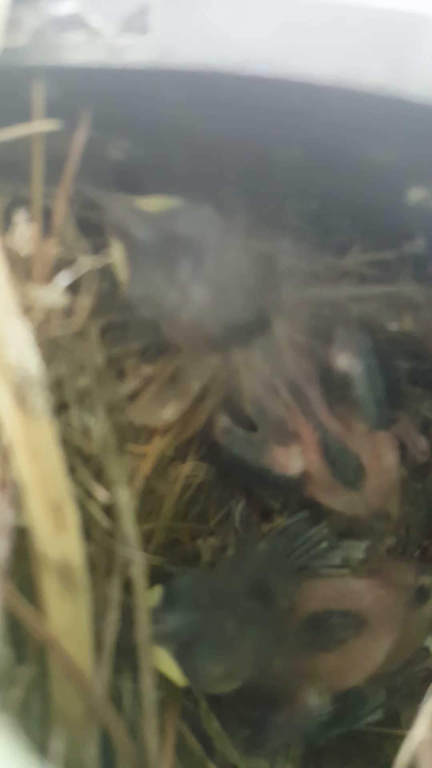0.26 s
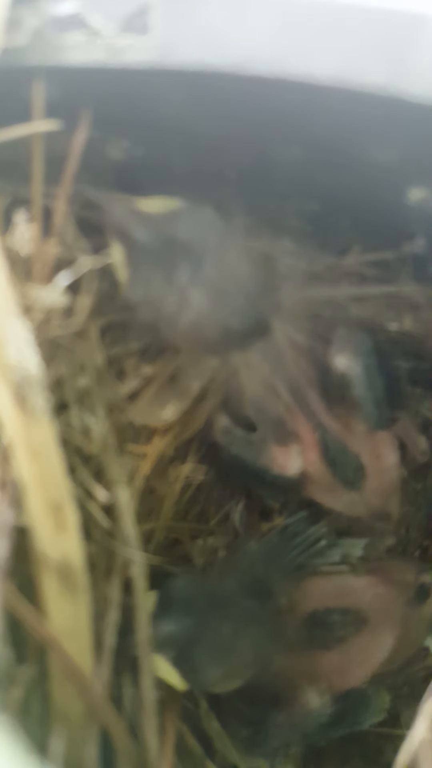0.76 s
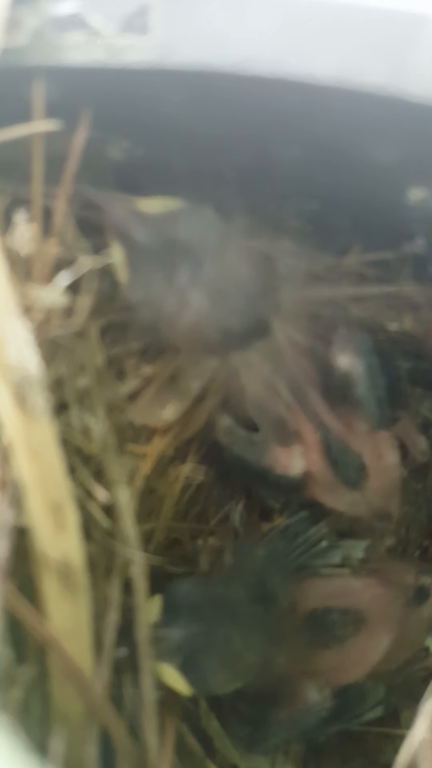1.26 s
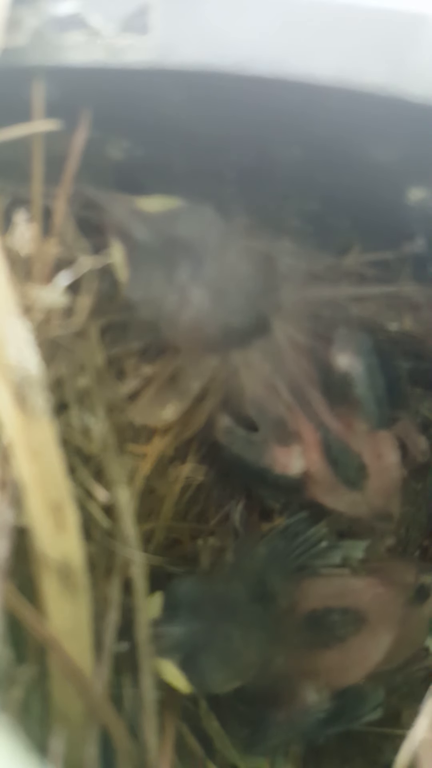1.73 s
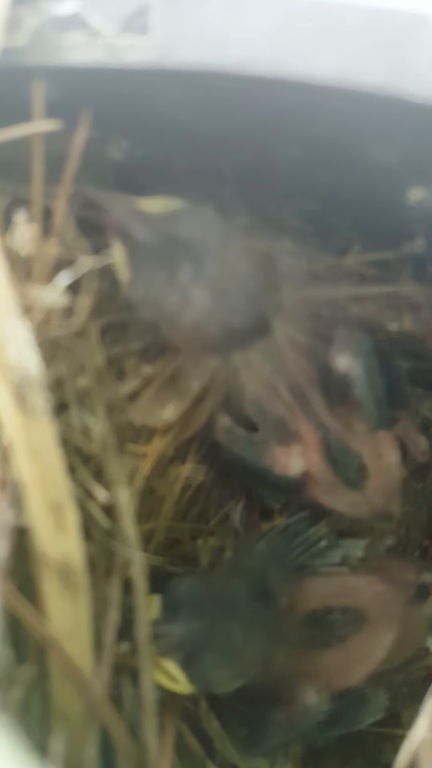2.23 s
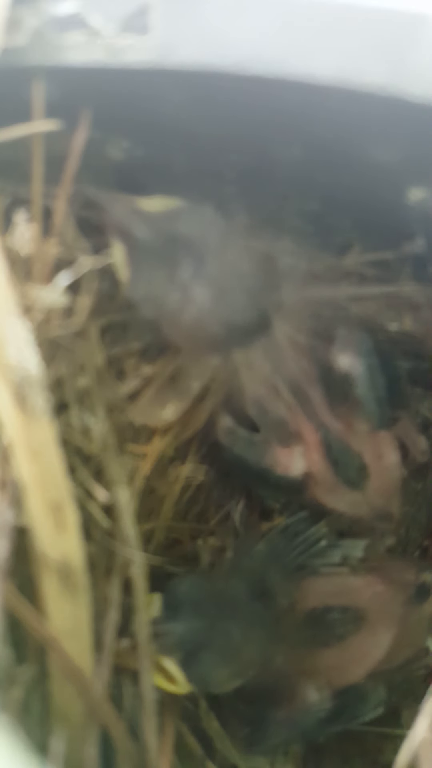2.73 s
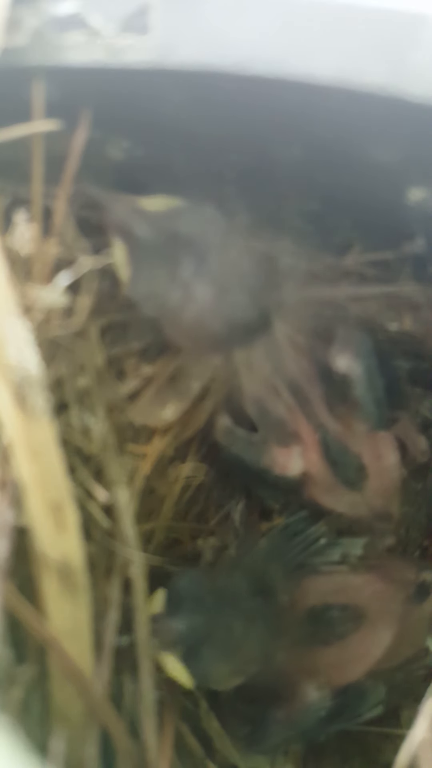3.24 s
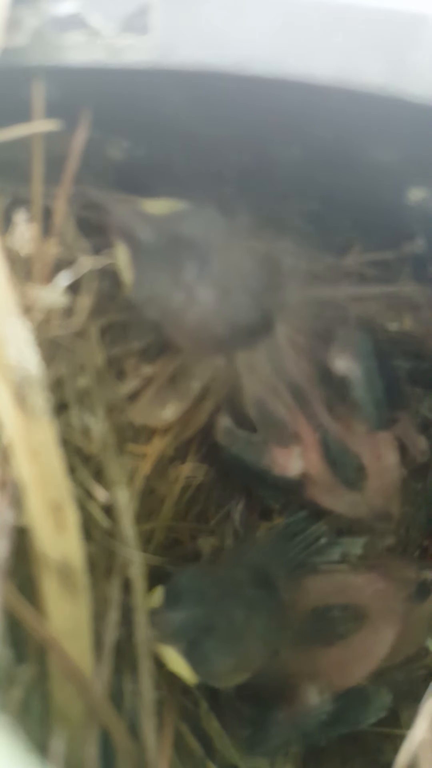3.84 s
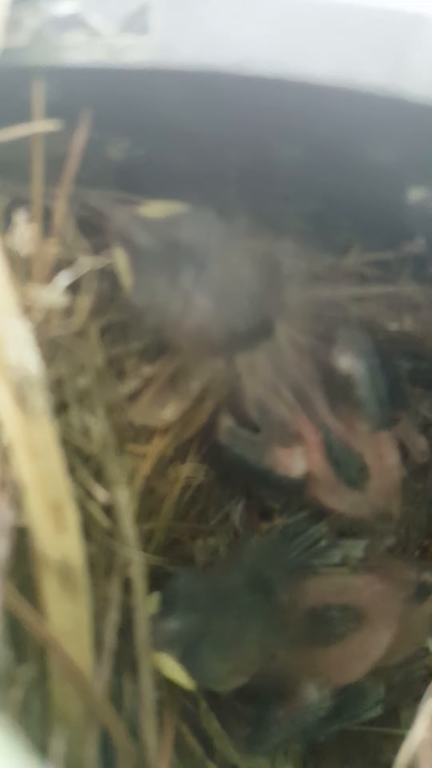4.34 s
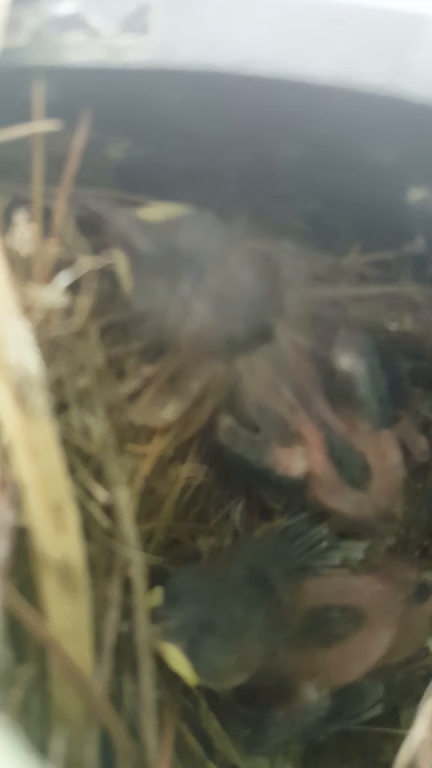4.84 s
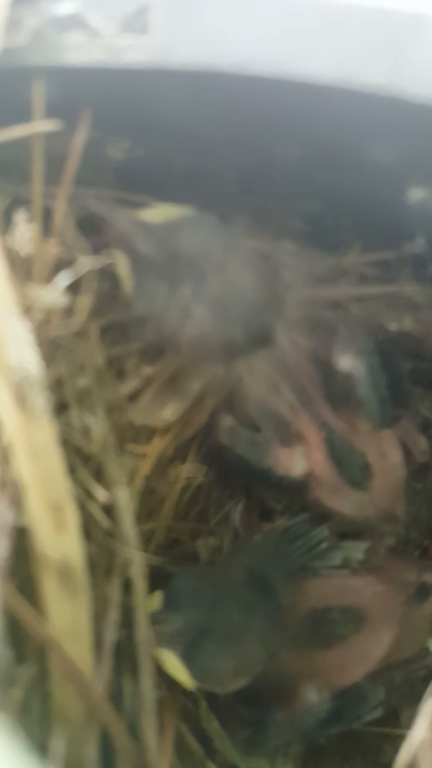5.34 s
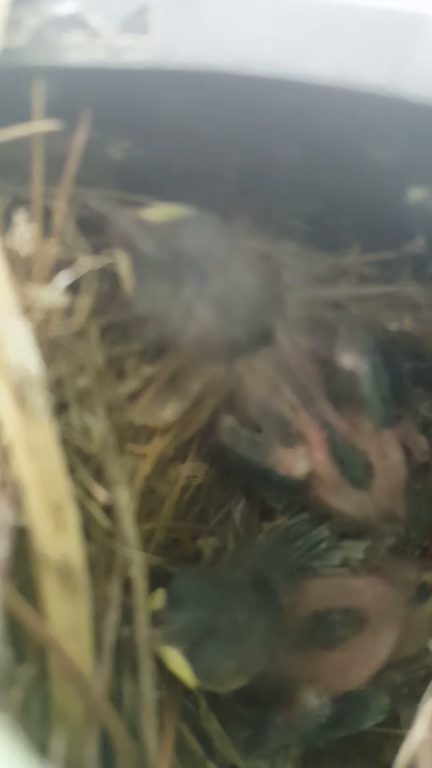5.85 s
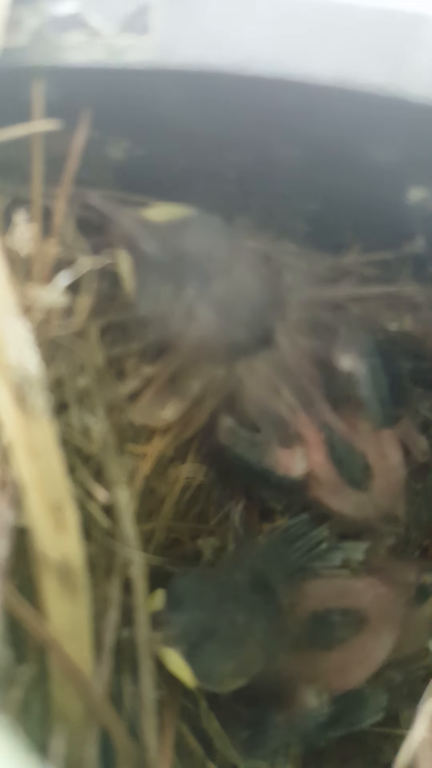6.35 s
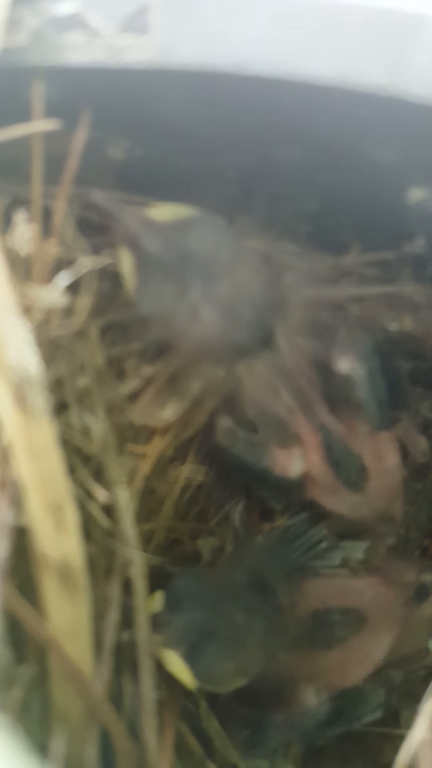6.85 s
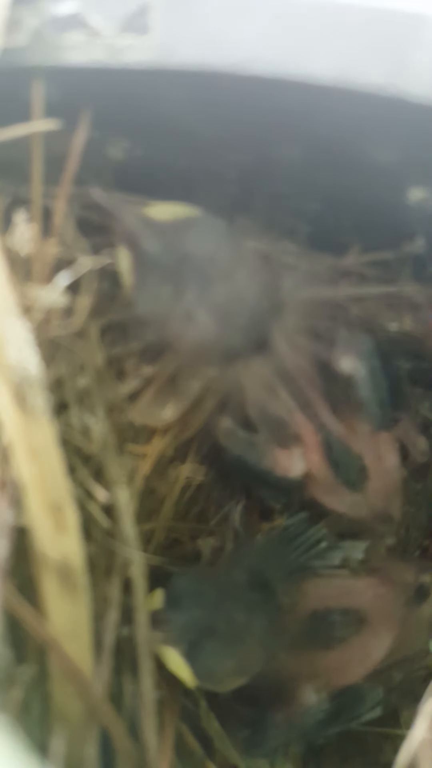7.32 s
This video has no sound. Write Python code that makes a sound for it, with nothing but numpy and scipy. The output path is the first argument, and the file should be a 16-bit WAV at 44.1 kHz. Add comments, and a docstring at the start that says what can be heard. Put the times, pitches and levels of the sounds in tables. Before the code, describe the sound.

Outdoors in grass, a six-cylinder vehicle hums low in the distance, then drops to idle with a faint falling whistle. It opens up with a rocking surge, swells to a roar of exhaust and tyres as it passes, then recedes. Thin insect shrilling continues; short burry chirps come mostly in pairs early on. Close dry straw rustles just after the loudest moment. Wide stereo, faint hiss.

```python
"""A six-cylinder vehicle creeps in the distance, idles, then accelerates past with a swell of tyre roar.
Its exhaust is a sum of lines locked to the crank angle, its road and air noise is shaped random noise,
and its turbocharger is a narrow band that glides; beams and inverse distance make the pass.
Nearby, insects shrill as filtered noise, something chirps mostly in pairs with a gliding sine,
and dry straw rustles as grainy noise bursts over a faint even hiss."""
import sys
import numpy as np
from scipy import signal
from scipy.fft import rfft, irfft, next_fast_len
from scipy.io import wavfile
from scipy.ndimage import uniform_filter1d, map_coordinates

SR = 44100
rng = np.random.default_rng(int(sys.argv[2]) if len(sys.argv) > 2 else 0)


def to_wav(s):
    """Save 16-bit WAV."""
    ch = np.atleast_2d(s).T  # columns
    pcm = np.round(np.clip(ch, -1, 1) * 32767)  # PCM
    wavfile.write(sys.argv[1], SR, pcm.astype(np.int16))


N = 334278  # samples


# left-right balance of the vehicle: [t/s, left minus right level/dB]
VEHICLE_PAN = [(0, 1.5), (5.8, 0.34), (6.7, 1.83)]


def vehicle():
    """Superposition: exhaust, road noise and turbocharger share one path and lie a little to the left."""
    firing_hz, effort_db, near_db, bearing = motion()
    sound = exhaust(firing_hz, effort_db, near_db, bearing)
    sound = sound + road_noise(firing_hz, effort_db, near_db, bearing)
    sound = sound + silencer(effort_db, near_db, bearing) + turbocharger(near_db)
    pan_db, = curves(VEHICLE_PAN)
    return sound * amp([pan_db / 2, -pan_db / 2])


# engine speed before the surge is added: [t/s, firing rate f/Hz]
ENGINE_SPEED = [(0, 58.27), (0.58, 63.33), (0.88, 63.33), (1.12, 64.7), (1.6, 66.6), (1.85, 64.67),
                (3.2, 65.06), (3.4, 67.24), (4.0, 66.6), (4.6, 71.18), (5.3, 74.9), (5.95, 77.22),
                (6.85, 78.3), (7.3, 78.85), (7.58, 79.56)]
# light throttle, idle, then full throttle: [t/s, effort level/dB]
THROTTLE_EFFORT = [(0, -5), (.5, -2.5), (1.62, -4), (1.97, -7.5), (3.27, -7), (3.46, -1), (5.2, 0.34)]
# the vehicle creeps, then drives past: [t/s, position along the road from the nearest point/m]
ROAD_POSITION = [(0, -61.5), (3.3, -43), (5.5, 0.5), (7.58, 34.5)]
DISTANCE_M = 20.2  # to the nearest point of the road


def motion(surge_hz=4.66, decay_s=1.03):
    """Inverse-distance law: firing rate (Hz), effort (dB), nearness (dB), bearing (rad, 0 abreast)."""
    firing_hz, = curves(ENGINE_SPEED)
    effort_db, = curves(THROTTLE_EFFORT)
    position_m, = curves(ROAD_POSITION)
    # opening the throttle rocks the drivetrain, so the speed swings and settles
    settling = np.exp(-np.maximum(clock() - SURGE_S, 0) / decay_s)
    bearing = np.arctan2(position_m, DISTANCE_M)
    near_db = 20 * np.log10(np.cos(bearing))
    return firing_hz + surge_hz * rocking() * settling, effort_db, near_db, bearing


SURGE_S, SURGE_PER_S = 3.42, 2.76  # start of the swing, swings a second


def rocking():
    """Torsional oscillation: the drivetrain swings between -1 and 1 once the throttle opens."""
    return np.sin(2 * np.pi * SURGE_PER_S * np.maximum(clock() - SURGE_S, 0))


def exhaust(firing_hz, effort_db, near_db, bearing, rasp_effort=1.53, drone_effort=1.3):
    """Harmonic synthesis: boom, rasp, hum, lope and drone all follow the crank angle."""
    firing = 2 * np.pi * np.cumsum(firing_hz) / SR
    crank = firing / 3  # six cylinders of a four-stroke fire three times a turn
    beamed = amp(rasp_effort * effort_db) * rasp(firing, bearing)
    beamed = beamed + amp(drone_effort * effort_db) * drone(crank, bearing)
    return boom(firing, firing_hz, near_db, bearing) + hum(crank) + lope(crank) + amp(near_db) * beamed


# the boom at the firing rate: [t/s, level/dB before the rocking]
BOOM_LEVEL = [(0.0, -32), (0.12, -31.5), (0.57, -33.5), (0.86, -27), (1.14, -28.5), (1.41, -20.5),
              (1.9, -27), (1.98, -44), (2.7, -34.5), (3.19, -42.5), (3.44, -21), (3.61, -19.5), (3.69, -28),
              (3.82, -20.5), (5.93, -18.5), (7.09, -26), (7.54, -22), (7.58, -22.5)]
# its octave sweeps over a notch and a resonance of the pipe: [f/Hz, level/dB over the boom]
OCTAVE_RESPONSE = [(120, -6), (127, -6), (132, -16), (136, -11.5), (140, -4.5), (148, 1.5), (155, 0.5),
                   (158, 0.5)]
# the octave is stronger just past abreast: [level/dB, bearing/deg, half width/deg, loss off the beam/dB]
OCTAVE_LOBE = (2.4, 28, 12, 3.7)


def boom(firing, firing_hz, near_db, bearing, resonance_hz=149, width_hz=4, rock_db=1.3):
    """Resonance: the octave's level and phase turn as it sweeps through the pipe's resonance."""
    # the level dips at each crest of the rocking and rises at each trough, most when abreast
    dip = amp(-rock_db * rocking() * amp(2 * near_db))
    octave = beam(bearing, *OCTAVE_LOBE) * amp(along(OCTAVE_RESPONSE, 2 * firing_hz) + 0.83 * wobble(9))
    turn = np.pi / 2 - np.arctan((2 * firing_hz - resonance_hz) / width_hz)
    level, = amp(curves(BOOM_LEVEL))
    return -np.sqrt(2) * level * dip * (np.cos(firing) + octave * np.cos(2 * firing + turn))


# rasp at 0 dB effort, abreast:
# [harmonic of the firing rate, level/dB, bearing/deg, half width/deg, loss off the beam/dB]
RASP_LOBES = [(3, -30, -8, 26, 10), (4, -31.5, 32.5, 22, 16)]


def rasp(firing, bearing, pipe_lag=.46):
    """Directivity: upper harmonics of the firing rate are beamed sideways; pipe_lag is in radians."""
    out = 0
    for k, *shape in RASP_LOBES:
        harmonic = -np.sqrt(2) * np.cos(k * firing + (k - 1) * pipe_lag)
        out = out + beam(bearing, *shape) * amp(2.45 * wobble(12)) * harmonic
    return out


# the exhaust favours other orders from each side, relative levels:
# [multiple of the crank speed, front level/dB, side level/dB, rear level/dB]
PIPE_ORDERS = [(10.48, 3, -25, -4.5), (10.87, -6, -22, -2), (12.05, -9.5, -25, -4.5), (12.92, -2, -1, -1.5),
               (14, 3, -20, 1.5), (15.16, 0.5, -20, -18), (16.02, -8, 2, -15), (16.96, -5, -3.5, -2.5),
               (18.11, -9, -4, -7), (18.95, 1, -7.5, -25), (21.16, -3.5, -16.5, -9), (23.95, -13, -24, -14)]
# front, side and rear lobes at 0 dB effort, abreast:
# [level/dB, bearing/deg, half width/deg, loss off the beam/dB]
PIPE_LOBES = [(-33.5, -38.5, 26.6, 27), (-23.5, 3.5, 22.7, 19), (-24, 75, 31, 19)]


def drone(crank, bearing):
    """Directivity: each view of the exhaust has its own higher orders, which sweep by in turn."""
    multiples, *views = np.transpose(PIPE_ORDERS)
    out = 0
    for shape, levels in zip(PIPE_LOBES, views):
        lines = orders(crank, zip(multiples, levels), smear=0.77, rate=10, spread=0.47, fading_db=4)
        out = out + beam(bearing, *shape) * lines
    return out


# hum of the lugging engine: [multiple of the crank speed, relative level/dB]
LUG_ORDERS = [(9, -6), (12, 1), (13, -8), (15, -7), (16, -6.5), (20, -9), (21, -5), (22, -7), (24, -12),
              (25, -7), (30, -9)]


def hum(crank, level_db=-42, end_s=1.85, release_s=0.21):
    """Order synthesis: lugging at low speed, the pipe hums until the throttle closes."""
    lugging = amp(level_db) * np.clip((end_s - clock()) / release_s, 0, 1)
    return lugging * orders(crank, LUG_ORDERS, smear=.6, rate=8, spread=.35, fading_db=2.6)


# unequal cylinders make the engine lope: [multiple of the crank speed, relative level/dB]
LOPE_ORDERS = [(2.5, -1), (3.5, -5), (4, 8.5), (4.5, 4.5), (5, -7), (5.5, 8), (6.5, 1.5), (7, -4.5)]
# [t/s, level/dB]
LOPE_SWELL = [(0, -37.5), (2.1, -39.5), (3.1, -39.5), (3.5, -31), (4.5, -37), (5.5, -41), (6.5, -41),
              (7.58, -32)]


def lope(crank):
    """Subharmonics: unequal cylinders add lines between the multiples of the firing rate."""
    level, = amp(curves(LOPE_SWELL))
    return level * orders(crank, LOPE_ORDERS, smear=0.76, rate=9, spread=0.064, fading_db=4.5)


# spectra of body rumble, roar, tyre hiss and engine air: [f/Hz, relative level/dB per Hz]
BODY_SPECTRUM = [(15, -8), (35, -6.5), (60, 3), (120, 3.5), (190, 5), (260, -2.5), (340, -1), (480, -1),
                 (650, -3), (900, -17.5), (2000, -56)]
ROAR_SPECTRUM = [(300, -50), (600, -3), (760, -6.5), (920, -5.5), (1100, -3), (1500, -10.5), (2000, -15),
                 (4000, -76)]
HISS_SPECTRUM = [(900, -26), (1500, -7), (2100, 0), (2800, -4.5), (3400, -14), (5000, -43.5), (9000, -64)]
AIR_SPECTRUM = [(2000, -9), (3200, 0.5), (4200, 0), (5600, -8), (7500, -11), (9200, -14), (10500, -21),
                (12500, -22), (16000, -32)]
# how each noise swells, by name: [level/dB at 0 dB effort abreast, share of the effort it follows,
# rise towards the rear/dB, lobe level/dB, lobe bearing/deg, lobe half width/deg]
NOISE_SWELLS = {"body": (-28, 0.97, 1.5, 0.5, 23, 19), "roar": (-33.3, 1.34, -1.1, 3, -4.5, 8.5),
                "hiss": (-36.5, 1.08, 1.3, 1.5, -24.5, 13), "air": (-42.5, 1.07, -0.7, 2.1, -5, 26)}


def road_noise(firing_hz, effort_db, near_db, bearing):
    """Amplitude modulation: noises swell with effort and nearness; body and roar puff once per firing."""
    def gain(name):
        db, share, rear_db, lobe_db, centre_deg, width_deg = NOISE_SWELLS[name]
        level_db = db + near_db + share * effort_db + rear_db * np.sin(bearing)
        return amp(level_db) * beam(bearing, lobe_db, centre_deg, width_deg, lobe_db)

    def puffs(depth):
        return unit(1 + depth * np.cos(2 * np.pi * np.cumsum(firing_hz) / SR))

    body = gain("body") * puffs(0.16) * rush(BODY_SPECTRUM, patchy_db=1.5)
    roar = gain("roar") * puffs(0.054) * rush(ROAR_SPECTRUM, patchy_db=1.5)
    hiss = gain("hiss") * rush(HISS_SPECTRUM, patchy_db=1.08)
    air = gain("air") * rush(AIR_SPECTRUM, patchy_db=1.9)
    return body + roar + hiss + air


def silencer(effort_db, near_db, bearing):
    """Cavity resonance: a hollow ring of the silencer, a narrow noise band beamed to the rear."""
    lobe = beam(bearing, db=-35, centre_deg=45, width_deg=19, depth_db=16.5)
    return amp(near_db + effort_db) * lobe * narrow(746, width_hz=130)


# runs down at idle, spools up under load, then eases: [t/s, whistle f/Hz]
TURBO_PITCH = [(1.9, 7290), (2.7, 5950), (3.25, 5400), (3.8, 6200), (5, 9100), (5.5, 9687), (6.6, 8800),
               (7.58, 8700)]


def turbocharger(near_db, level_db=-60.5, fade_s=0.85):
    """Narrow-band noise: the turbocharger's fuzzy whistle comes through once the throttle closes."""
    hz, = curves(TURBO_PITCH)
    rise = np.clip((clock() - TURBO_PITCH[0][0]) / fade_s, 0, 1)
    whistle = unit(0.87 * narrow(hz, width_hz=1100) + narrow(hz, width_hz=260))
    return amp(level_db + near_db) * rise * whistle


# spectra of the chorus and of the buzz: [f/Hz, relative level/dB per Hz]
CRICKET_SPECTRUM = [(6500, -43), (7400, -10.5), (7750, -10), (8200, -4.5), (8700, -6), (9000, -19),
                    (10000, -45), (12000, -61)]
BUZZ_SPECTRUM = [(3600, -63), (4000, -3), (4260, 0), (4600, -14), (6000, -50), (10000, -18), (11300, -16),
                 (12050, -5), (12700, -14), (13500, -22.5), (16000, -35)]
# single crickets that stand out, before the balance: [f/Hz, level/dB, end of song t/s]
NEAR_SINGERS = [(7910, -61.5, 3.9), (8020, -69, 8), (8250, -65.5, 8), (8670, -69.5, 8)]


def insects():
    """Band-limited noise: a cricket chorus, nearer singers, and a buzz near 4 and 12 kHz that soon stops."""
    chorus = amp(-55.5) * rush(CRICKET_SPECTRUM, patchy_db=-1.0)
    for hz, db, end in NEAR_SINGERS:
        fade = np.clip((end - clock()) * 10, 0, 1)  # over 0.1 s
        chorus = chorus + amp(db) * fade * narrow(hz, width_hz=70)
    buzz_db, = curves([(0, -54.5), (.7, -57), (.82, -64), (.9, -110)])  # t/s, level/dB
    balance = amp([[-.4], [.4]])  # slightly to the right
    return chorus * balance + amp(buzz_db) * rush(BUZZ_SPECTRUM, patchy_db=3.0)


# [t/s, level/dB before the direct and echo gains, length/s]
CHIRP_TIMES = [(0.413, -50, 0.082), (0.555, -49, 0.052), (1.213, -52.5, 0.045), (1.276, -48.5, 0.041),
               (1.871, -47, 0.061), (1.999, -48, 0.05), (2.584, -54.5, 0.057), (2.647, -53.5, 0.046),
               (3.91, -53, 0.1)]


def chirps(pitch_hz=3180, fall=0.03, waver_hz=95, burr=.75, burr_hz=48, ring_s=0.69, wet_db=-3):
    """Frequency modulation and reverberation: short, burry, falling chirps, scattered by the surroundings."""
    t, envelope, sag = clock(), np.zeros(N), np.zeros(N)
    for start, db, length in CHIRP_TIMES:
        progress = (t - start) / length
        inside = (progress > 0) & (progress < 1)
        u = progress[inside]
        pulsing = 1 - burr * np.cos(2 * np.pi * burr_hz * (t[inside] - start))
        envelope[inside] += amp(db) * pulsing * np.sqrt(np.abs(np.sin(np.pi * u)))
        sag[inside] = u - .5
    hz = pitch_hz * (1 - fall * sag) + waver_hz * wobble(230)
    tone = np.sqrt(2) * np.sin(2 * np.pi * np.cumsum(hz) / SR)
    call = envelope * amp(1.6 * wobble(60)) * tone
    # the tail falls 60 dB in ring_s and is cut at half a second
    tail = rng.standard_normal((2, SR // 2)) * amp(-60 * t[:SR // 2] / ring_s)
    echo = signal.fftconvolve(call[None], tail / np.linalg.norm(tail[0]), axes=1)[:, :N]
    return 0.5 * call + amp(wet_db) * echo


# straw shifting: [peak t/s, level/dB, rise time constant/s, fall time constant/s]
STRAW_RUSTLES = [(5.455, -59, .008, 0.014), (5.74, -57, 0.011, .015), (5.865, -62, .006, .01),
                 (5.977, -43, 0.0024, .012), (6.07, -46, 0.18, 0.047), (6.115, -46, .02, 0.044)]


def straw(grain_db=3):
    """Friction noise: dry stalks slide over each other in brief grainy rustles."""
    t, envelope = clock(), np.zeros(N)
    for peak, db, rise, fall in STRAW_RUSTLES:
        envelope += amp(db) * np.exp(-np.maximum((peak - t) / rise, (t - peak) / fall))
    grains = rng.standard_normal((2, N)) * amp(grain_db * wobble(900))
    spectrum = [(1000, -24), (4000, 0), (9000, 3), (12000, -6), (16000, -11)]  # f/Hz, level/dB
    return envelope * stereo(grains, spectrum)


def background():
    """White noise: a faint even hiss, independent in each ear."""
    return amp(-75) * rng.standard_normal((2, N))


def beam(bearing, db, centre_deg, width_deg, depth_db):
    """Directivity: gain of a Gaussian lobe that sweeps over the listener as the vehicle passes."""
    lobe = np.exp(-((np.degrees(bearing) - centre_deg) / width_deg) ** 2)
    return amp(db) * (lobe + amp(-depth_db) * (1 - lobe))


def orders(crank, table, smear, rate, spread, fading_db):
    """Multipath: lines locked to the crank angle fade, smear in phase and part the ears (rms 1)."""
    out = np.zeros((2, N))
    ears = np.array([[1], [-1]])
    for multiple, db in table:
        phase = multiple * crank + rng.uniform(0, 2 * np.pi) + smear * wobble(rate)
        out += amp(db + fading_db * wobble(6)) * np.sin(phase + spread * wobble(1.96) * ears)
    return unit(out)


def narrow(hz, width_hz):
    """Quadrature modulation: narrow stereo noise of rms 1 around a steady or moving frequency."""
    phase = 2 * np.pi * np.cumsum(hz * np.ones(N)) / SR
    ears = [wobble(width_hz) * np.cos(phase) + wobble(width_hz) * np.sin(phase) for _ in range(2)]
    return unit(np.array(ears))


def rush(spectrum, patchy_db):
    """Time-frequency shaping: stereo noise of rms 1 with patches of random gain."""
    z = signal.stft(rng.standard_normal((2, N)), nperseg=1024)[2]
    field = rng.standard_normal(z.shape[1:])
    field = uniform_filter1d(field, size=4, axis=0)  # across frequency
    field = uniform_filter1d(field, size=10, axis=1)  # across time
    patchy = signal.istft(z * amp(patchy_db * unit(field)), nperseg=1024)[1][:, :N]
    return stereo(patchy, spectrum)


# likeness of the ears: [f/Hz, left-right correlation]
EAR_CORRELATION = [(60, 0.19), (160, 0.83), (300, 0.84), (600, 0.59), (1200, 0), (4000, 0.025),
                   (12000, 0.056)]


def stereo(pair, spectrum):
    """Interaural coherence: mixes two signals so the ears share the low mids but little treble."""
    def response(hz):
        turn = np.arccos(np.clip(along(EAR_CORRELATION, hz), -1, 1)) / 2
        return amp(along(spectrum, hz)) * np.array([np.cos(turn), np.sin(turn)])
    mid, side = filtered(pair, response)
    return unit(np.array([mid + side, mid - side]))


def filtered(x, response):
    """Convolution theorem: x times a response of frequency."""
    m = next_fast_len(N + SR // 2)
    return irfft(rfft(x, m) * response(np.fft.rfftfreq(m, 1 / SR)), m)[..., :N]


def wobble(rate):
    """Interpolated noise: a smooth random curve with rate knots a second."""
    knots = rng.standard_normal(int(N * rate / SR) + 4)
    fine = np.arange(0, len(knots) - 1, 1 / 16)
    return np.interp(clock() * rate, fine, map_coordinates(knots, [fine]))


def curves(rows):
    """Linear interpolation: one value per sample for each column after the time."""
    s, *cols = np.transpose(rows)
    return [np.interp(clock(), s, c) for c in cols]


def along(points, hz):
    """Logarithmic frequency scale: (f/Hz, value) points read on a log axis."""
    f, v = np.transpose(points)
    return np.interp(np.log(hz + 1), np.log(f + 1), v)


def clock():
    """Uniform sampling: the time of every sample in seconds."""
    return np.arange(N) / SR


def unit(x):
    """Normalisation: x at rms 1."""
    return x / np.sqrt(np.mean(x ** 2) + 1e-20)


def amp(db):
    """Level law: decibels to amplitude gain."""
    return 10 ** (np.asarray(db) / 20)


def scene():
    """Superposition: the vehicle, the small sounds of the grass and a faint even hiss."""
    return vehicle() + insects() + chirps() + straw() + background()


def record(dry, top_hz=15800, fade_s=.004):
    """Band limiting: the sound fades in and out briefly and keeps nothing above top_hz."""
    t = clock()
    fade = np.clip(np.minimum(t, t[-1] - t) / fade_s, 0, 1)
    return filtered(dry * fade, lambda hz: hz < top_hz)


dry = scene()
out = record(dry)
to_wav(out)
```